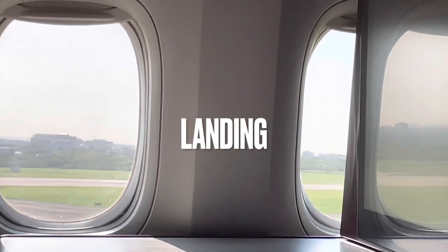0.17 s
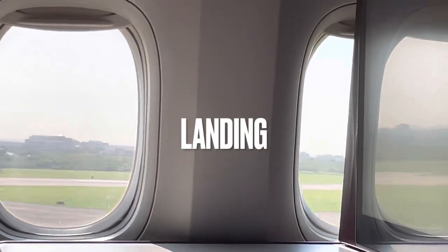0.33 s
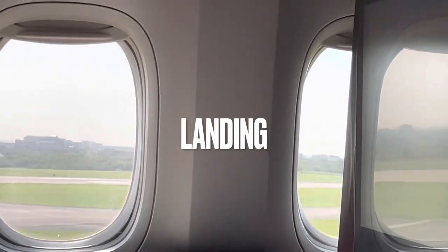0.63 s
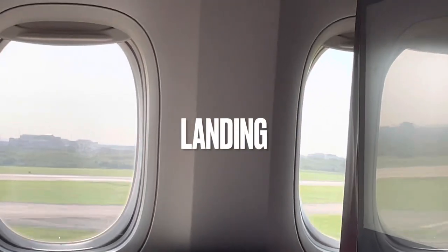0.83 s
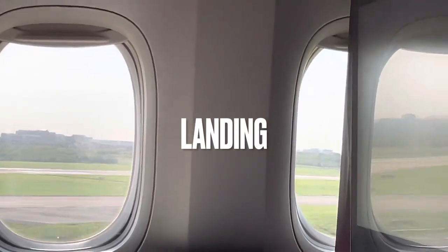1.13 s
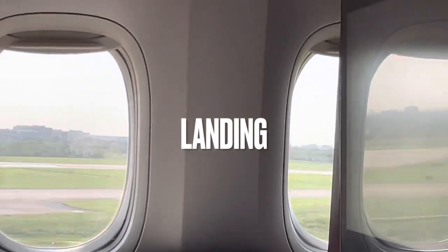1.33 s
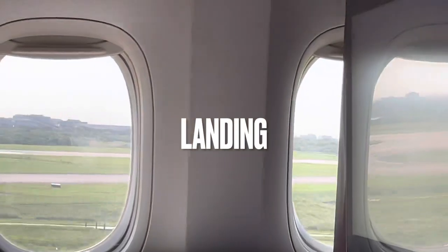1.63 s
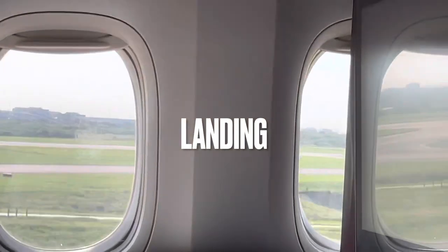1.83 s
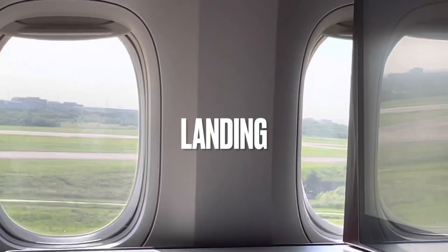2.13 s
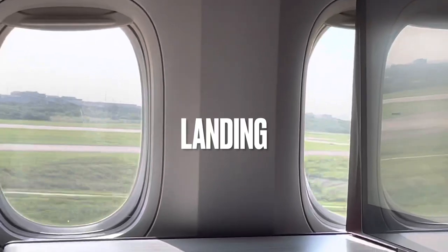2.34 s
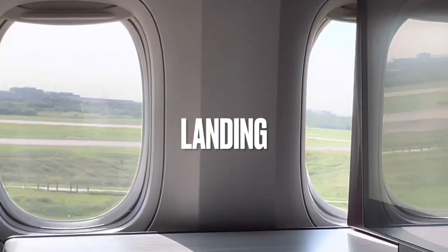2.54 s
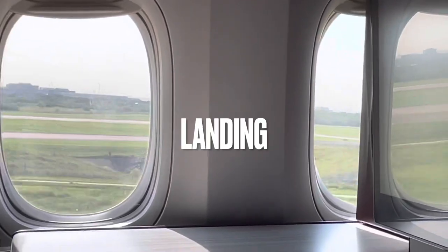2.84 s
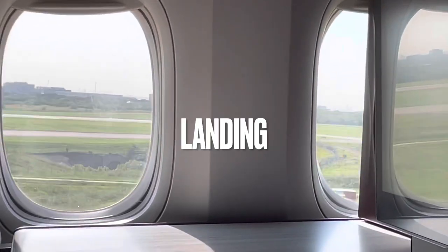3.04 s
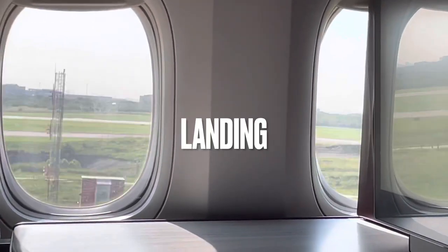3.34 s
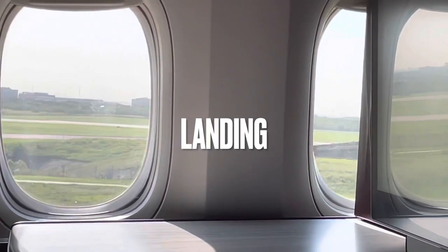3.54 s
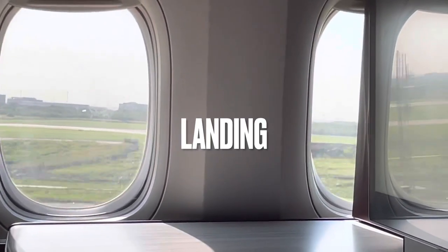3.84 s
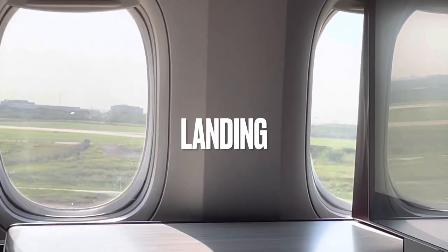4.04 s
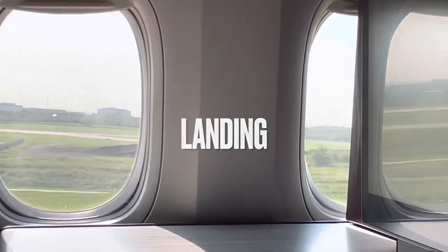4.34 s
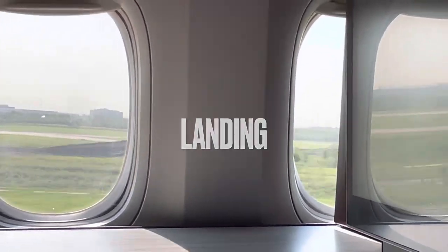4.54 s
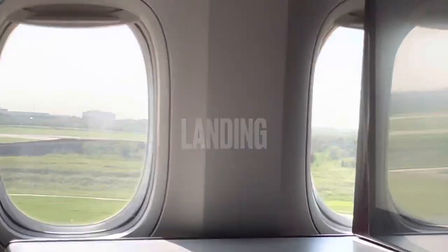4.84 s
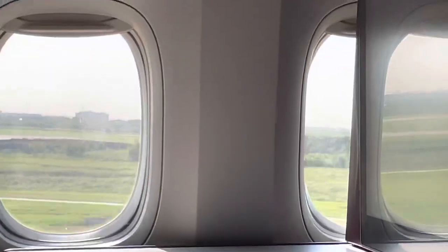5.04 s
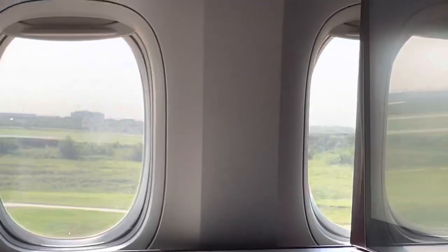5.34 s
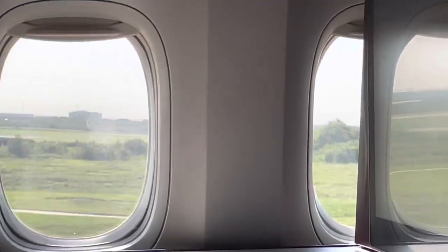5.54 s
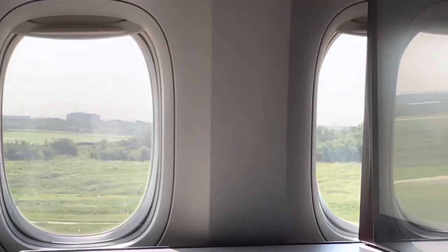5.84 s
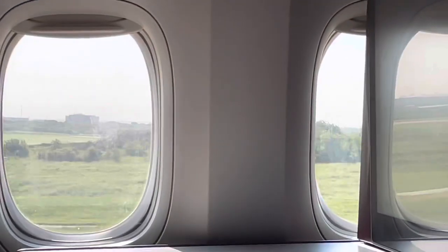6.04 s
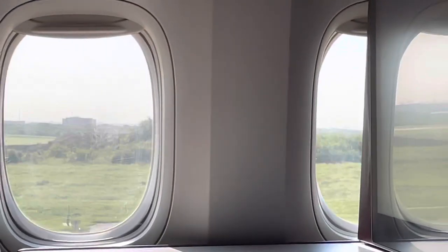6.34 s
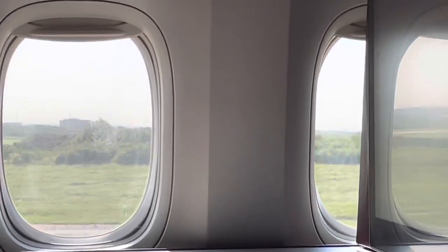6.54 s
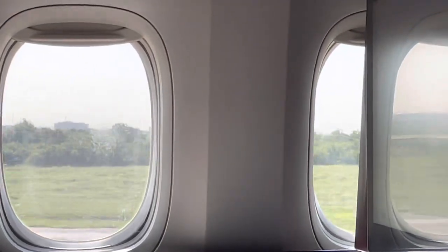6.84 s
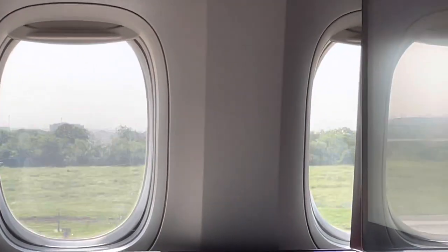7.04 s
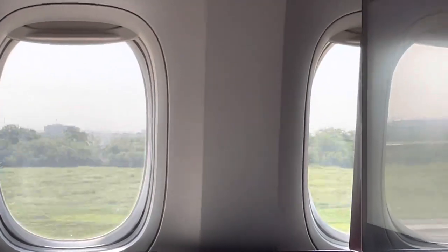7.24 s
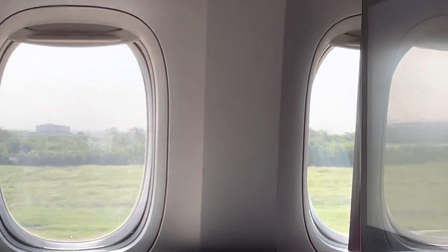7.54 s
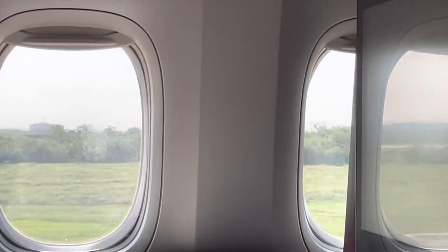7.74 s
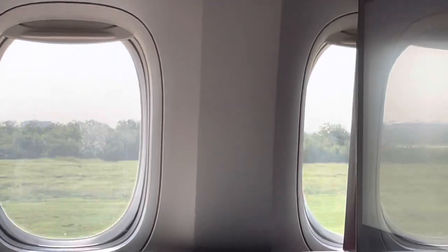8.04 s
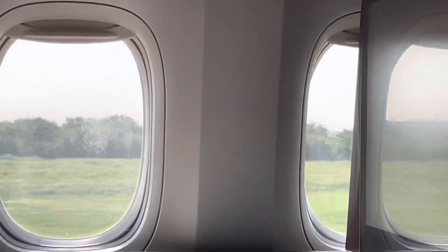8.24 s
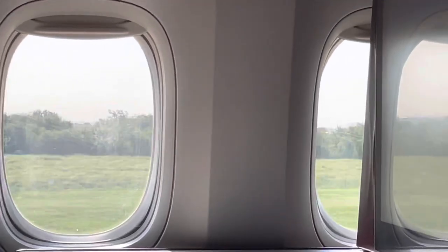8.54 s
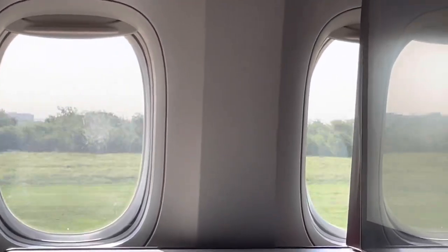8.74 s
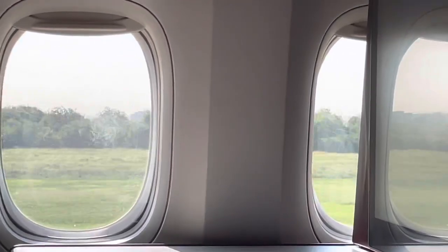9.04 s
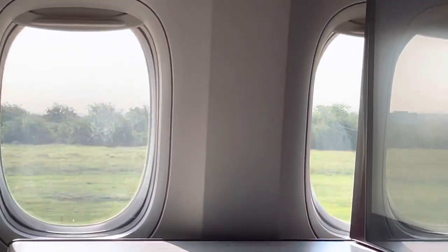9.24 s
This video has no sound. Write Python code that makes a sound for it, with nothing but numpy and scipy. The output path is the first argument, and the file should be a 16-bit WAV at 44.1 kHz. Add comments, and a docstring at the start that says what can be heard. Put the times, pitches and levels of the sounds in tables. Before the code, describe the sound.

Inside a landing airliner, steady air rush gives way to a touchdown thump, wheel rumble, rattling cabin fittings and a swelling engine roar.

```python
"""An airliner's wheels touch down and rumble over the runway, heard in stereo from a window seat.
The jolts set the cabin trim rattling, and fittings nearby clack, knock, creak and squeak.
The roar swells as reverse thrust comes in. Behind it all, air and engines rush past the cabin wall;
before touchdown the airframe shakes gently and the whine of the idling turbines sinks."""
import sys
import numpy as np
from scipy import signal
from scipy.fft import rfft, irfft, next_fast_len
from scipy.io import wavfile
from scipy.ndimage import uniform_filter1d, map_coordinates

SR = 44100
rng = np.random.default_rng(int(sys.argv[2]) if len(sys.argv) > 2 else 0)


def dump_mix(stems):
    """Bounce the given channels to the path in sys.argv[1] as a 16-bit WAV at rate SR."""
    frames = np.atleast_2d(stems).T  # one column per channel
    limited = np.clip(frames, -1, 1)  # hard clip at full scale
    pcm = np.round(limited * 32767).astype(np.int16)
    wavfile.write(sys.argv[1], SR, pcm)


N = 413658
TOUCHDOWN_S = 3.88


def undercarriage(load, buffet_db=-23.2, gust_db=1.1, roll_db=-18.5, uneven_db=2.0, spin_up_s=0.043):
    """Buffeting in flight gives way to wheel rumble, growing with load, and runway and reverser roar."""
    # Spectra of the shaking airframe, the wheels and the roar. Each row: frequency in Hz, level in dB.
    airframe_spectrum = [(15, -37), (25, -8), (40, -6.5), (55, 2.5), (70, 2.5), (90, -2.5), (110, -7.5)]
    wheel_spectrum = [(15, -34), (25, -20), (40, -4), (52, 0), (66, 1.5), (82, -2.5), (110, -11.5)]
    roar_spectrum = [(110, -4.5), (150, 0), (220, -2.5), (290, -5.5), (335, -2), (420, -7), (520, -13.5)]
    # Swell of runway and reverse thrust. Each row: time in seconds, relative level in dB.
    roar_levels = [(3.95, -45), (3.99, -35), (4.45, -18.5), (5.25, -24.5), (5.68, -24), (6.3, -29.5),
                   (6.5, -25.5), (7.4, -23.5), (8.55, -20), (9.32, -21.5)]
    roar_db, = curves(roar_levels)
    buffet_gain = amp(buffet_db + gust_db * wobble(4.05))
    buffet = buffet_gain * rumble(airframe_spectrum, below_db=18, above_db=13.5, span_s=0.12)
    wheel_gain = np.hypot(amp(roll_db + uneven_db * wobble(7.6)), load)
    wheels = wheel_gain * rumble(wheel_spectrum, below_db=20, above_db=16, span_s=0.105)
    roar = amp(roar_db - 0.5) * rumble(roar_spectrum, below_db=17, above_db=37, span_s=0.076)
    grounded = after_touchdown(spin_up_s)
    return (1 - grounded) * buffet + grounded * (wheels + roar)


def gear_load():
    """Weight comes onto the gear: the strength of the rumble and of the slower rattle it stirs up."""
    # First contact, main wheels, rough stretches and nose wheel.
    # Each row: start in seconds, length in seconds, rumble in dB, rattle in dB.
    loads = [(3.903, 0.26, -21, -37), (4.16, 0.67, -13.5, -24), (6.25, 0.83, -18, -64),
             (7.427, 0.36, -17.5, -40.5), (7.88, 0.64, -9.5, -33), (8.722, 0.29, -17.5, -66),
             (9.145, .3, -15.5, -57)]
    attack_s, sag_db_per_s, release_t60 = 0.067, 4.5, 0.33  # rumble
    build_s, hold_s, fall_db_per_s = 0.24, 0.2, 23.5  # rattle
    rumble_power, rattle_power = np.zeros(N), np.zeros(N)
    for start, length, rumble_db, rattle_db in loads:
        t = np.maximum(np.arange(N) / SR - start, 0)
        held = np.minimum(t / attack_s, 1) * fade(np.maximum(t - length, 0), release_t60)
        rumble_power += (held * amp(rumble_db - sag_db_per_s * t)) ** 2
        built = np.minimum(t / build_s, 1) ** 2
        dying_s = np.maximum(t - build_s - hold_s, 0)
        rattle_power += (built * amp(rattle_db - fall_db_per_s * dying_s)) ** 2
    return np.sqrt(rumble_power), np.sqrt(rattle_power)


def bumps(judder_s=5.1, period_s=0.073, judder_db=-19, loss_db=11):
    """Single jolts, and the dying judder of the main gear as it takes the weight."""
    # Jolts through the landing gear. Each row: start in seconds, strength in dB.
    single_jolts = [(2.695, -3.5), (3.918, -4), (4.208, -9), (4.263, -3), (7.936, 1), (9.157, 1)]
    judder = [(judder_s + k * period_s, judder_db - k * loss_db) for k in range(5)]
    return list(single_jolts) + judder


def jolts(boom_hz=63, t60=0.23, rise_s=0.011):
    """Each bump sets the fuselage booming for a few cycles."""
    t, out = np.arange(SR // 2) / SR, np.zeros(N)
    boom = np.sin(2 * np.pi * boom_hz * t) * fade(t, t60) * (1 - np.exp(-t / rise_s))
    for start, db in bumps():
        add(out, start, amp(db) * boom)
    return out


def rattle(shake, panel_floor_db=-38.5, trim_floor_db=-43, jingle_db=-16.5, jingle_lag_s=0.046):
    """Runway vibration makes big panels drum, small trim clatter and light metal jingle just after."""
    # Spectra of the panels and the trim. Each row: frequency in Hz, level in dB.
    panel_spectrum = [(450, -4.5), (600, -2.5), (800, 0.5), (1000, -4.5), (1300, -16)]
    trim_spectrum = [(1300, 1), (1650, -1), (2000, 1.5), (2400, -4), (3000, -5.5), (4000, -10.5),
                     (6000, -14), (9000, -21), (13000, -34.5), (15500, -25)]
    t = np.arange(N) / SR
    panel_taps = chatter(taps_per_s=450, spread_db=2, bunch_db=3, t60=0.059)
    panels = coloured(panel_taps, panel_spectrum, below_db=42, above_db=8)
    panels *= np.hypot(amp(panel_floor_db), amp(1.5) * shake) * surge(depth=2.5, t60=1.0)
    trim_taps = chatter(taps_per_s=800, spread_db=0, bunch_db=4.5, t60=0.077)
    trim = coloured(trim_taps, trim_spectrum, below_db=30, above_db=6)
    trim *= np.hypot(amp(trim_floor_db), shake) * surge(depth=0.55, t60=0.64)
    jingle = metallic(chatter(taps_per_s=110, spread_db=2, bunch_db=-1, t60=0.04))
    jingle *= amp(jingle_db) * np.interp(t - jingle_lag_s, t, shake)
    return after_touchdown(rise_s=0.18) * (panels + trim + jingle)


def chatter(taps_per_s, spread_db, bunch_db, t60, parts=10):
    """Loose parts, each tapping at random in bursts and ringing in its own way."""
    t, out = np.arange(SR // 8) / SR, np.zeros((2, N))
    for _ in range(parts):
        size_db = spread_db * rng.uniform(-2.3, 2.3, N) + bunch_db * 2 * np.tanh(wobble(17) / 2)
        taps = (rng.random(N) < taps_per_s / parts / SR) * amp(size_db)
        out += signal.oaconvolve(taps[None], burst(t, t60), axes=1)[:, :N]
    return out


def surge(depth, t60):
    """Loose parts jump at each bump and then settle: a gain whose local mean stays near 1."""
    t, kick = np.arange(SR // 2) / SR, np.ones(N)
    for start, db in bumps():
        add(kick, start, depth * amp(db) * fade(t, t60))
    return kick / uniform_filter1d(kick, SR // 6)


def clacks(lead_s=0.0034, skirt=3.0):
    """Hard fittings strike: a dense, quickly dying ring around each one's own pitch."""
    # Each row: start in seconds, level in dB, centre in Hz, width in octaves, t60 in seconds.
    strikes = [(1.69, -23.5, 2200, 1.3, 0.11), (4.062, -22, 2040, 1.2, 0.065),
               (4.131, -19, 1860, 1.1, 0.25), (4.245, -21, 1690, 0.89, .13),
               (4.311, -18.5, 2280, 1.6, 0.12), (4.328, -12, 1850, .35, 0.098),
               (4.416, -10, 2200, 0.49, 0.18), (4.437, -14, 2730, .22, 0.16), (4.485, -8, 1850, 0.82, 0.14),
               (4.545, -11.5, 1900, 1, 0.2), (4.546, -19.5, 5150, 1.2, 0.31),
               (4.622, -16, 3600, 1.05, 0.37), (4.695, -21, 3400, 1.3, .25),
               (4.912, -16.5, 2030, 0.51, 0.13), (5.013, -23.5, 2000, 2, 0.072),
               (5.398, -22, 2400, 1.4, 0.1), (5.418, -15, 2260, 1.6, 0.041),
               (5.473, -22.5, 2150, 1.25, 0.2), (5.632, -20, 2200, 1.4, 0.11),
               (5.75, -26.5, 2205, 1.09, 0.1), (5.860, -22, 1906, 0.49, 0.07),
               (6.297, -23, 2000, 1.1, 0.071), (6.413, -20, 1960, 0.75, 0.08),
               (6.816, -26, 3200, 1.1, 0.07), (7.017, -27, 3000, 1.14, .13), (7.327, -26, 1879, 0.53, 0.12),
               (7.69, -28, 2608, 1.4, .07), (7.757, -19.5, 2580, 1.4, 0.26), (8.024, -8, 3230, 1.16, 0.054),
               (8.116, -4, 1742, 0.54, 0.028), (8.283, -21, 2623, 1.5, 0.28),
               (9.187, -11.5, 5400, 1.5, 0.081), (9.197, -17, 2530, 0.6, 0.35),
               (9.205, -21, 4700, 0.3, 0.15)]
    t, out = np.arange(SR // 4) / SR, np.zeros((2, N))
    for start, db, centre_hz, octaves, t60 in strikes:
        strike = np.pad(burst(t, t60), ((0, 0), (int(lead_s * SR), 0)))  # room for the onset to spread
        detuning = lambda hz: np.log2((hz + 1) / centre_hz) / octaves
        ring = filtered(strike, lambda hz: (1 + detuning(hz) ** 2 / skirt) ** -(skirt + 1))
        add(out, start - lead_s, amp(db) * ring / np.abs(ring).max())
    return diffuse(out)


def knocks():
    """Blunt blows ring a hollow bin or seat, each at the pitch that its size gives it."""
    # Each row: start in seconds, level in dB, pitch ratio, t60 in seconds.
    blows = [(4.332, -8.5, 1.22, 0.2), (4.412, -7, 1.04, .16), (4.496, -9, 0.99, .15),
             (4.566, -6.5, 1.28, 0.14), (4.622, -9, 0.91, 0.17), (5.40, -15, 1.41, .15),
             (7.758, -14.5, 1.22, 0.17), (8.116, -5, 0.972, 0.13), (8.63, -19, 1.4, .16),
             (8.868, -9, 1.12, 0.14), (8.885, -18, 1.15, .13)]
    # A bin's resonances at pitch ratio 1. Each row: centre in Hz, width in Hz, level in dB.
    bin_modes = [(173, 44, 5), (485, 75, 7), (614, 86, 0), (793, 84, -2.5), (1035, 127, -6),
                 (1460, 250, -10)]
    t, out = np.arange(SR // 4) / SR, np.zeros((2, N))
    body = lambda hz: sum((-1) ** k * amp(db) * 1j * hz * width / (centre**2 - hz**2 + 1j * hz * width)
                          for k, (centre, width, db) in enumerate(bin_modes))
    for start, db, pitch, t60 in blows:
        ring = filtered(burst(t, t60), lambda hz: body(hz / pitch))
        add(out, start, amp(db) * ring / np.abs(ring).max(axis=1, keepdims=True))
    return diffuse(out)


def creaks(slips_per_s=170, scatter_db=2.5, t60=0.061):
    """As the cabin flexes, panel joints slip in short, uneven runs, and every slip rings the trim."""
    # Each row: start in seconds, length in seconds, level in dB.
    runs = [(2.508, 0.065, -41.5), (2.69, 0.053, -42.5), (5.409, .04, -32), (5.531, 0.078, -34.5),
            (5.639, 0.055, -36.5), (5.747, 0.024, -33), (5.903, 0.032, -47), (6.279, 0.043, -38),
            (6.355, 0.058, -36), (6.421, 0.028, -40), (6.713, 0.044, -43), (6.928, 0.076, -43),
            (7.068, 0.063, -44), (7.246, 0.064, -38), (7.324, 0.067, -39), (7.44, 0.11, -38),
            (8.038, 0.076, -30.5)]
    # Spectrum of creaking plastic. Each row: frequency in Hz, level in dB.
    plastic_spectrum = [(1200, -3.5), (1500, 2.5), (2050, 0), (2500, -3.5), (3300, -10.5), (4600, -13),
                        (6500, -17.5), (13000, -31)]
    t, out = np.arange(SR // 16) / SR, np.zeros((2, N))
    for start, length, db in runs:
        run = np.zeros((2, int(length * SR) + len(t)))
        slips = max(int(length * slips_per_s), 2)
        for k in range(slips):
            ring = burst(t, t60)
            slip_s = (k + rng.random()) * length / slips
            add(run, slip_s, amp(scatter_db * rng.standard_normal()) * ring)
        gain = amp(db) * np.sqrt(length * SR / run.shape[1])
        add(out, start, gain * coloured(run, plastic_spectrum, below_db=10, above_db=6))
    return out


def squeaks(glide=0.01, jitter=0.075, flutter_db=6):
    """Plastic edges stick and slip: short, slightly rising chirps that creak when the slip is uneven."""
    # Each row: start in seconds, level in dB, pitch in Hz, length in seconds, overtone in dB,
    # roughness from 0 to 1.
    rubs = [(0.168, -35, 2030, 0.052, -30, .25), (0.75, -51, 11500, .04, -60, .5),
            (0.885, -52, 11400, .035, -60, .5), (2.115, -43, 2060, .04, -25, .4),
            (2.42, -42, 2020, .03, -25, .4), (2.687, -54, 11400, .05, -60, .5),
            (3.012, -44, 2070, .04, -25, .4), (3.44, -44, 2070, .05, -25, .4),
            (4.31, -23, 2180, 0.03, -18, .75), (4.755, -23, 2190, 0.035, -22, .75),
            (5.468, -27, 2130, 0.036, -17, .7), (5.623, -24.5, 2190, 0.03, -22, .45),
            (5.652, -33, 2170, .035, -22, .5), (5.864, -34, 2300, 0.046, -8, .3),
            (6.457, -30, 2280, 0.046, -8, .25), (6.814, -35, 2300, .022, -1, .28),
            (6.832, -33.5, 2330, .02, -11, .25)]
    out = np.zeros(N)
    unsteady = jitter * (wobble(1100) + 0.2 * wobble(140))
    grip_db = flutter_db * wobble(350)
    for start, db, pitch_hz, length, overtone_db, rough in rubs:
        progress = np.linspace(0, 1, int(length * SR))
        now = slice(round(start * SR), round(start * SR) + len(progress))
        bend = 1 + glide * (progress - 0.5) + rough * unsteady[now]
        phase = 2 * np.pi * np.cumsum(pitch_hz * bend) / SR
        swell = np.sin(np.pi * np.sqrt(progress)) ** 0.7 * unit(amp(rough * grip_db[now]))
        add(out, start, amp(db) * swell * (np.sin(phase) + amp(overtone_db) * np.sin(2 * phase)))
    return out


def ticks():
    """Buckles and catches strike singly: a sharp, bright click with a short ring."""
    # Each row: start in seconds, peak level in dB, t60 in seconds.
    clicks = [(4.284, -22, 0.046), (4.418, -19, 0.047), (4.668, -21, 0.046), (4.712, -25, .05),
              (4.878, -36, 0.023), (4.923, -27, .08), (8.115, -22.5, 0.062), (8.167, -24, 0.027),
              (8.395, -26, 0.044), (8.482, -28, 0.072), (8.552, -25.5, 0.071), (8.568, -27, 0.067),
              (8.678, -31, .05), (8.785, -30, 0.18), (8.891, -31, 0.14)]
    t, out = np.arange(SR // 8) / SR, np.zeros((2, N))
    for start, db, t60 in clicks:
        ring = metallic(burst(t, t60))
        add(out, start, amp(db) * ring / np.abs(ring).max())
    return out


def metallic(taps):
    """Give taps the bright ring of small metal parts."""
    # Each row: frequency in Hz, level in dB.
    metal_spectrum = [(4200, 2.5), (6500, -1.5), (9500, -6), (13000, -18)]
    return coloured(taps, metal_spectrum, below_db=14, above_db=6)


def airflow():
    """The boundary layer and the engines rush evenly through the fuselage wall beside the seat."""
    # Strength of the rush. Each row: time in seconds, level in dB.
    rush_levels = [(0, -24.5), (3.9, -24.5), (5.2, -26.5), (7.4, -27.5), (9.38, -22.5)]
    # Its spectrum inside the cabin. Each row: frequency in Hz, level in dB.
    rush_spectrum = [(110, -0.5), (170, -3), (250, -3.5), (350, -8.5), (500, -14), (700, -20.5),
                     (1000, -23.5), (1600, -31), (2100, -28), (2600, -31), (4000, -35.5), (7000, -43),
                     (13000, -57.5), (15500, -55)]
    level_db, = curves(rush_levels)
    gain = amp(level_db + 0.82 * wobble(5))
    return gain * coloured(rng.standard_normal((2, N)), rush_spectrum, below_db=6.5, above_db=6)


def engines(whine_width_hz=45, waver=0.002):
    """Blade tones flutter, sink and swell in turn as the spool slows; a few fuzzy hums hold pitch."""
    # The turbine spool. Each row: time in seconds, blade tone in Hz.
    spool = [(0, 3340), (2.3, 3245), (3.9, 3172), (9.38, 3180)]
    # Each row: ratio to the blade tone, level in dB, loudest time in seconds, half-length in seconds.
    blades = [(.87, -52, 3.6, .45), (.998, -52, 3.2, 1.3), (1.124, -55.5, 3.1, .85)]
    # Steady cabin tones. Each row: pitch in Hz, level in dB, width in Hz.
    hums = [(335, -37.5, 36), (2118, -54, 80), (2857, -59, 14)]
    t = np.arange(N) / SR
    pitch_hz, = curves(spool)
    phase = 2 * np.pi * np.cumsum(pitch_hz * (1 + waver * wobble(7.6))) / SR
    whine = np.zeros(N)
    for ratio, db, loudest_s, half_s in blades:
        swell = amp(db) / np.hypot(1, ((t - loudest_s) / half_s) ** 2)
        whine += swell * fuzzy_tone(ratio * phase, whine_width_hz, core=0.6)
    hum = sum(amp(db) * fuzzy_tone(2 * np.pi * hz * t, width, core=0) for hz, db, width in hums)
    return whine + hum


def fuzzy_tone(phase, width_hz, core):
    """A narrow band of noise around a pure tone of strength core."""
    return unit(np.real((core + wobble(width_hz) + 1j * wobble(width_hz)) * np.exp(1j * phase)))


def rumble(spectrum, below_db, above_db, span_s):
    """Low noise that throbs quickly but keeps its strength over span_s."""
    noise = coloured(rng.standard_normal((2, N)), spectrum, below_db, above_db)
    power = uniform_filter1d(np.mean(noise ** 2, 0), int(span_s * SR) + 1)
    return noise / np.sqrt(np.abs(power) + 1e-6)


def coloured(pair, spectrum, below_db, above_db):
    """Stereo sound of rms 1 with a spectrum whose skirts fall by so many dB an octave."""
    octaves = lambda high, low: np.maximum(np.log2((high + 1) / (low + 1)), 0)
    skirt_db = lambda hz: below_db * octaves(spectrum[0][0], hz) + above_db * octaves(hz, spectrum[-1][0])
    return unit(diffuse(filtered(pair, lambda hz: amp(along(spectrum, hz) - skirt_db(hz)))))


def diffuse(pair):
    """Two unrelated signals become left and right of the cabin's sound field."""
    # Each row: frequency in Hz, likeness of left and right from 0 to 1.
    likeness = [(40, 0.97), (80, 0.95), (130, 0.88), (300, 0.74), (420, 0.68), (1000, 0.61), (1600, 0.46),
                (2000, 0.86), (2600, 1)]
    turn = lambda hz: np.arccos(np.clip(along(likeness, hz), 0, 1)) / 2
    mid, side = filtered(pair, lambda hz: np.array([np.cos(turn(hz)), np.sin(turn(hz))]))
    return np.array([mid + side, mid - side])


def after_touchdown(rise_s):
    """0 in flight, rising to 1 once the wheels meet the runway."""
    return np.clip((np.arange(N) / SR - TOUCHDOWN_S) / rise_s, 0, 1)


def burst(t, t60):
    """Two channels of dying noise."""
    return rng.standard_normal((2, len(t))) * fade(t, t60)


def fade(t, t60):
    """Exponential decay that loses 60 dB in t60."""
    return np.exp(-np.log(1000) * t / t60)


def amp(db):
    """Decibels to gain."""
    return 10 ** (np.asarray(db) / 20)


def unit(x):
    """Scale to rms 1."""
    return x / np.sqrt(np.mean(x ** 2) + 1e-20)


def along(points, hz):
    """(Hz, value) points read on a log axis."""
    freqs, values = np.transpose(points)
    return np.interp(np.log(hz + 1), np.log(freqs + 1), values)


def curves(rows):
    """One value per sample for each column after the time."""
    times, *columns = np.transpose(rows)
    return [np.interp(np.arange(N) / SR, times, column) for column in columns]


def wobble(rate):
    """A smooth random curve, rate knots a second."""
    return map_coordinates(rng.standard_normal(int(N * rate / SR) + 4), [np.arange(N) * rate / SR])


def filtered(x, response):
    """Shape x by a response given as a function of Hz."""
    size = x.shape[-1]
    padded = next_fast_len(size + 8192)
    return irfft(rfft(x, padded) * response(np.fft.rfftfreq(padded, 1 / SR)), padded)[..., :size]


def add(track, start, sound):
    """Mix a sound into a track at start seconds."""
    part = track[..., round(start * SR):][..., :sound.shape[-1]]
    part += sound[..., :part.shape[-1]]


def scene():
    """Everything that reaches the window seat."""
    load, shake = gear_load()
    background = airflow() + engines()
    landing = undercarriage(load) + jolts()
    cabin = rattle(shake) + creaks() + clacks() + ticks() + knocks() + squeaks()
    return landing + cabin + background


def record(dry, top_hz=15750):
    """Left and right differ in level and twist apart in phase; peaks are rounded and the top is cut."""
    # Each row: frequency in Hz, left minus right level in dB.
    lean = [(60, -1.3), (120, 0.5), (220, 1), (340, 4), (520, 3.5), (1000, 0.5), (2000, 3.5), (2700, 0)]
    # The phase twists apart in steps in the treble. Each row: frequency in Hz, left minus right in radians.
    twist = [(6100, 0), (7100, -1.3), (7900, -3), (8700, -3.3), (10700, -6.2), (12700, -6.4), (14200, -9.3),
             (15700, -9.5)]
    tilt = lambda hz: amp(along(lean, hz) / 2) * np.exp(0.5j * along(twist, hz))
    pair = filtered(dry, lambda hz: np.array([tilt(hz), 1 / tilt(hz)]))
    rounded = pair / (1 + np.abs(pair) ** 6) ** (1 / 6)
    return filtered(rounded, lambda hz: hz < top_hz)


dry = scene()
out = record(dry)
dump_mix(out)
```